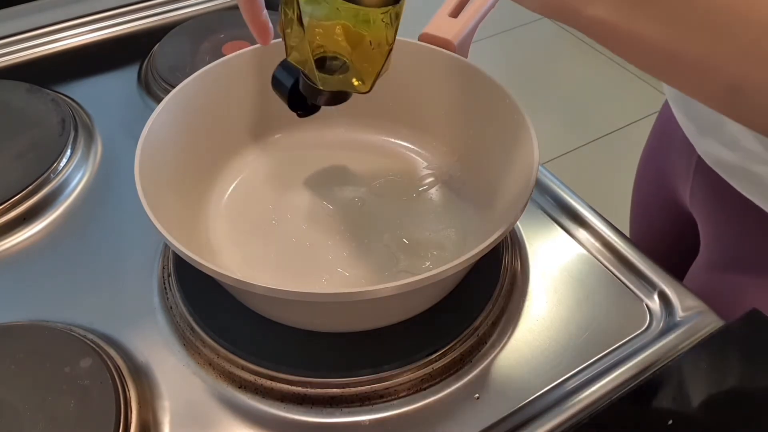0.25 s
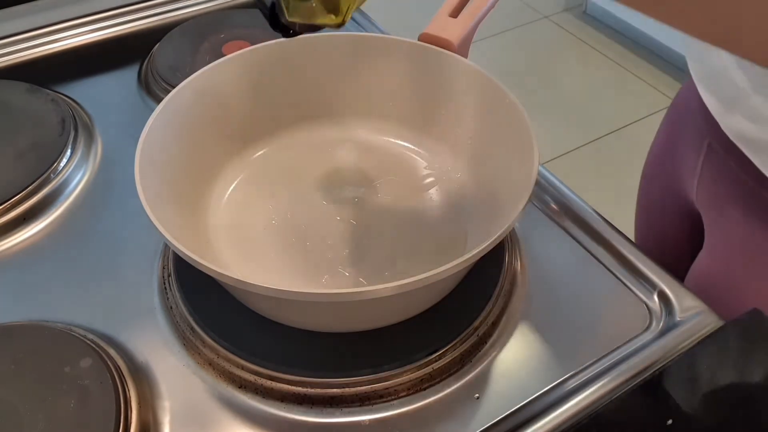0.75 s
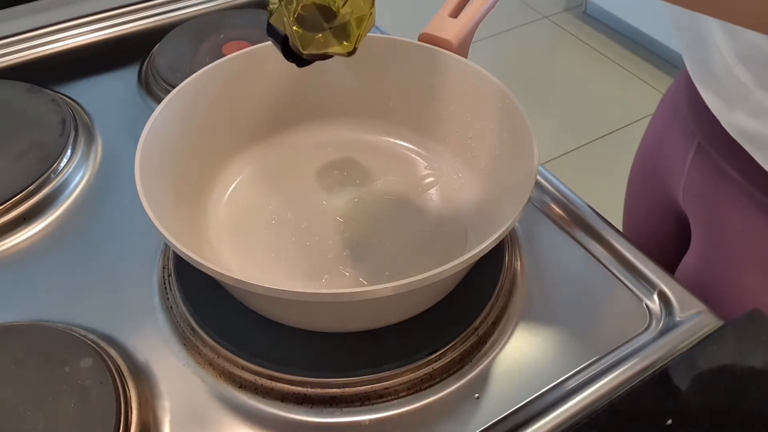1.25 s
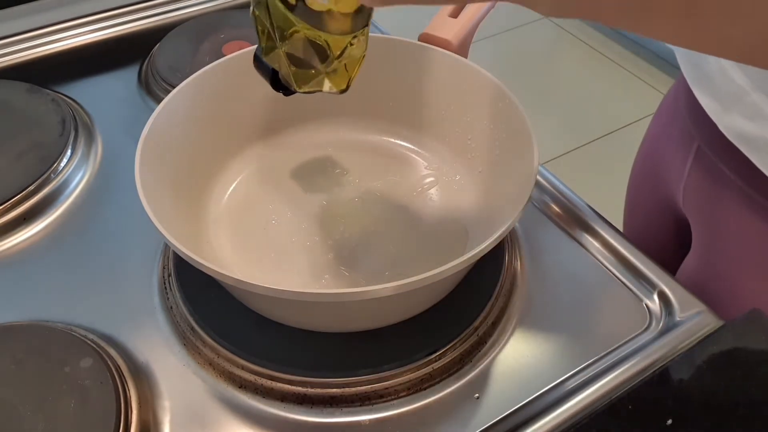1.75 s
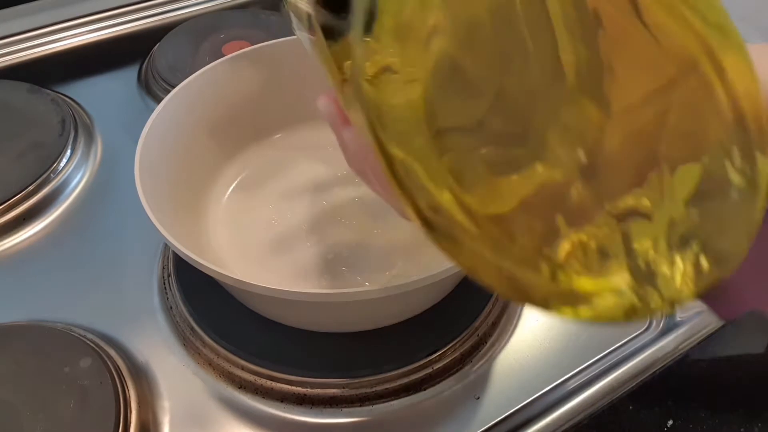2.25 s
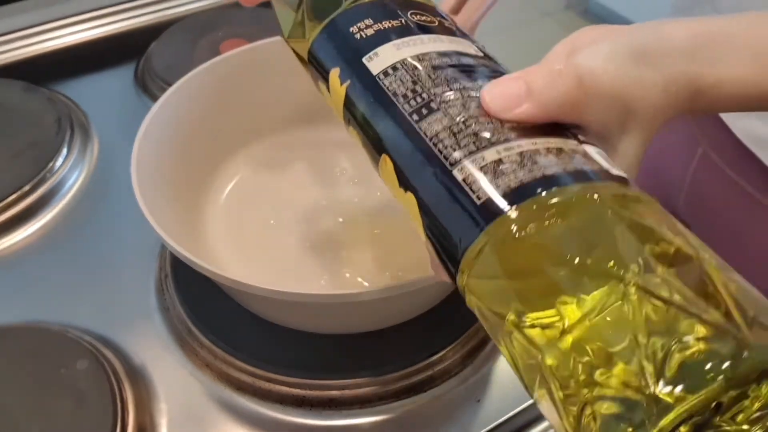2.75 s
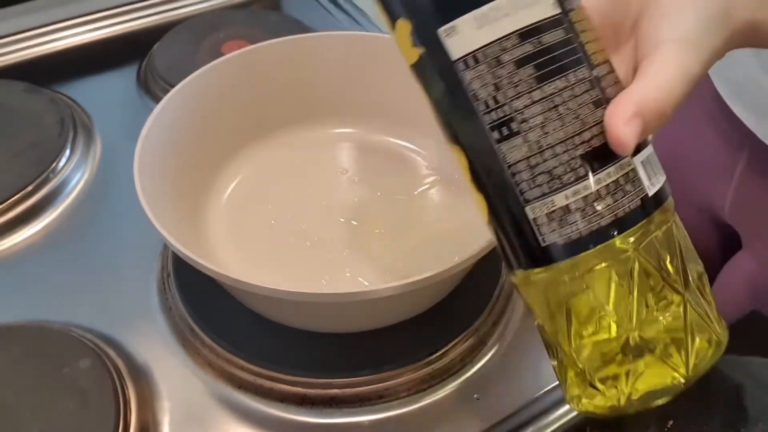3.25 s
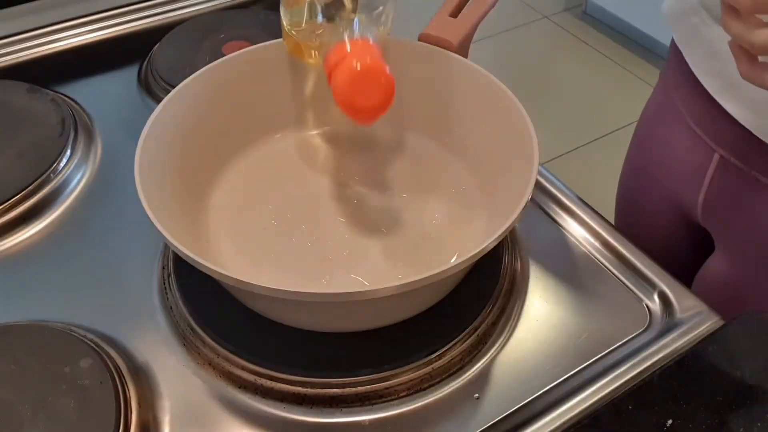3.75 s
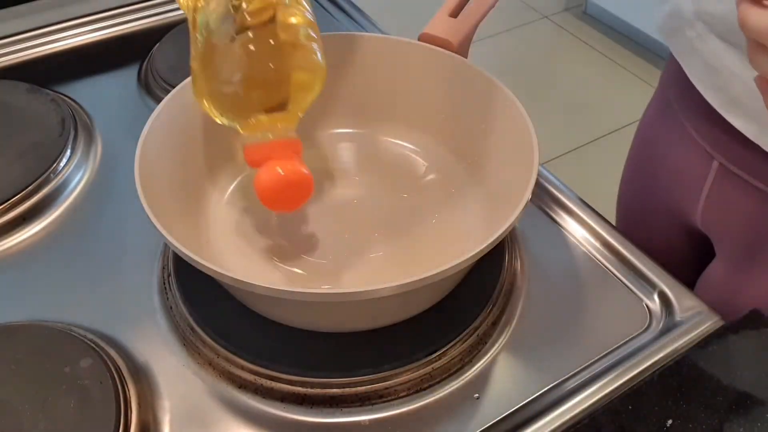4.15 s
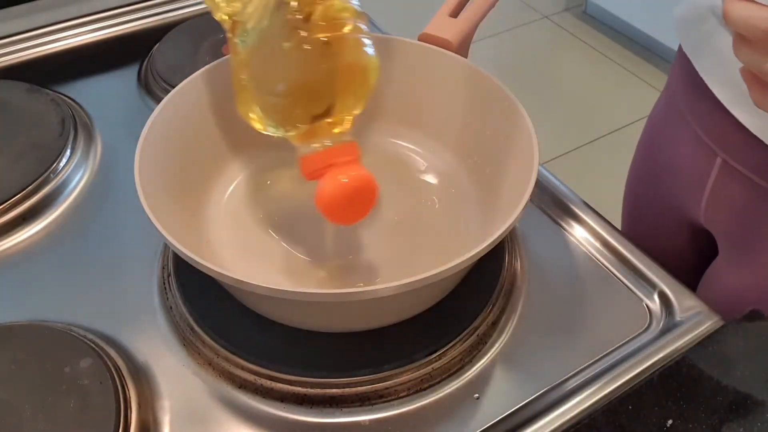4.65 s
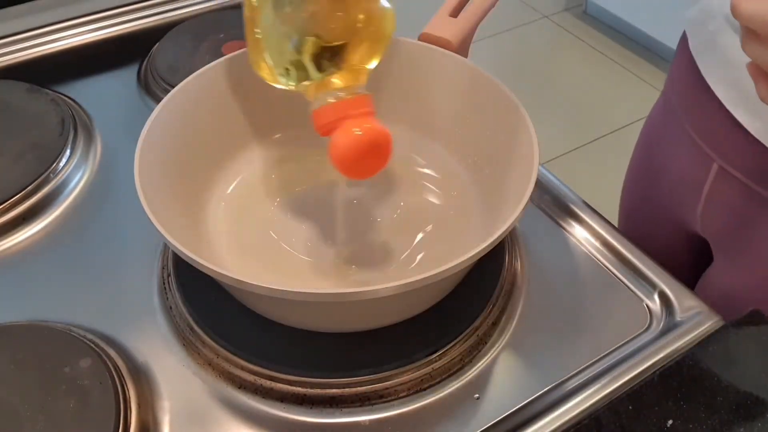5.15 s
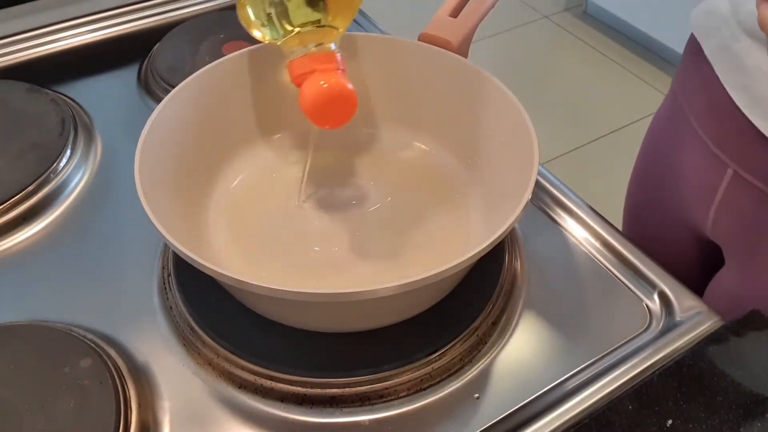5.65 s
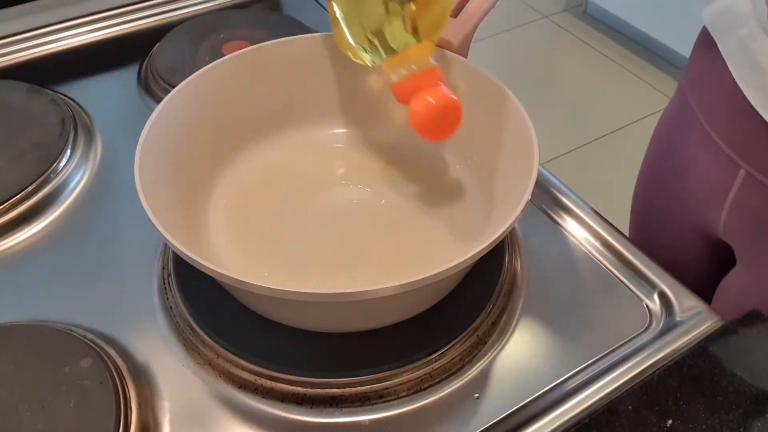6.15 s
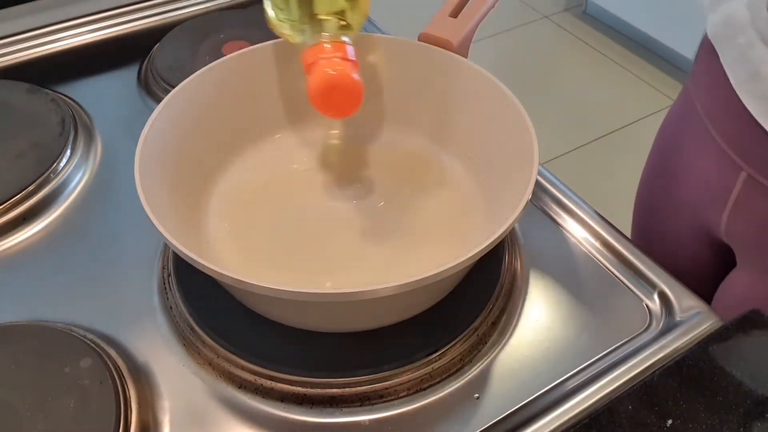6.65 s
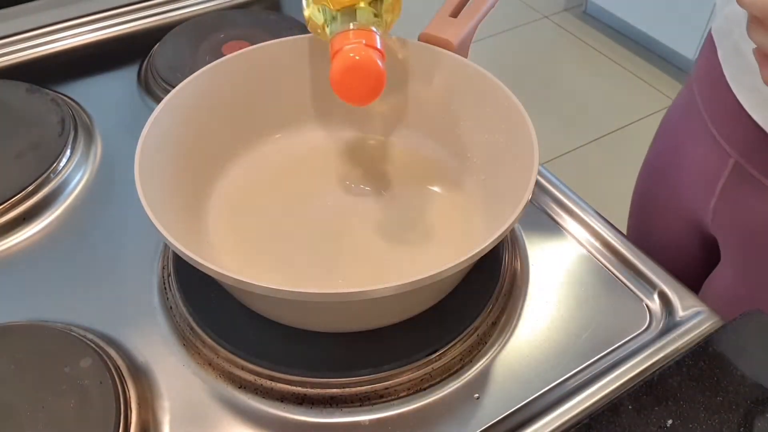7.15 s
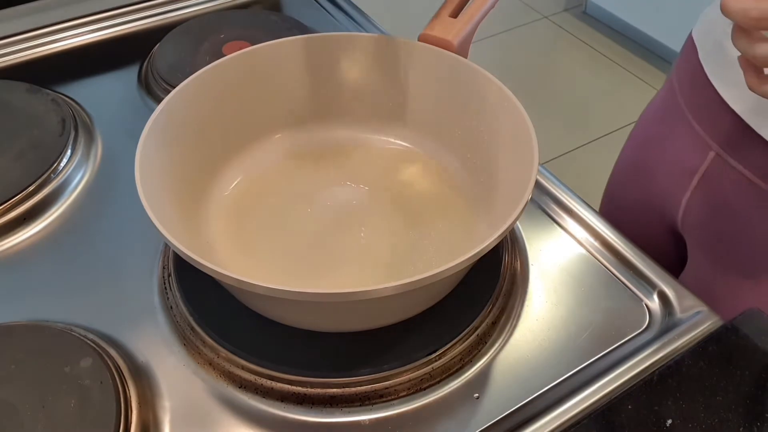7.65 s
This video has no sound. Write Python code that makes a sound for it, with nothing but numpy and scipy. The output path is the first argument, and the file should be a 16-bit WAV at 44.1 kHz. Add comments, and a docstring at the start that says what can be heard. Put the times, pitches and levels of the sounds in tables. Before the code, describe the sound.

Plastic oil bottles pop, hiss and softly glug as they are squeezed over a frying pan, above a low kitchen hum.

```python
"""A low hum and faint hiss fill a tiled kitchen; then a plastic bottle pops, squeezing oil into a frying pan.
Its thin walls buckle under the grip, and between squeezes air hisses and whistles back in at the spout,
where the oil spits and ticks. A second bottle glugs softly as it pours, each air bubble ringing as a
small resonator, and at last it crumples. The room reverberates behind it all."""
import sys
import numpy as np
from scipy import signal
from scipy.fft import rfft, irfft
from scipy.io import wavfile
from scipy.ndimage import uniform_filter1d

SR = 44100
rng = np.random.default_rng(int(sys.argv[2]) if len(sys.argv) > 2 else 0)


def bounce(signal):
    """Save signal as a 16-bit WAV file at the path given by the first command-line argument."""
    frames = np.transpose(np.atleast_2d(signal))
    limited = np.clip(frames, -1, 1)
    pcm = np.round(limited * 32767).astype(np.int16)
    wavfile.write(sys.argv[1], SR, pcm)


N = 348390
T = np.arange(N) / SR


def undb(db):
    """Decibels to amplitude ratio."""
    return 10 ** (np.asarray(db) / 20)


def unit(x):
    """Normalise to rms 1."""
    return x / np.sqrt(np.mean(x ** 2))


def curves(table):
    """Linear interpolation of (time_s, ...) rows: one curve for each further column."""
    times, *columns = np.transpose(table)
    return [np.interp(T, times, column) for column in columns]


def along(hz, points):
    """Interpolation of (frequency_hz, value) points on a logarithmic frequency axis."""
    f, value = np.transpose(points)
    return np.interp(np.log(np.maximum(hz, 1)), np.log(f), value)


def colour(x, points, size=4096):
    """Minimum-phase filter through (frequency_hz, gain_db) points, made by folding the cepstrum."""
    cepstrum = irfft(np.log(undb(along(np.fft.rfftfreq(size, 1 / SR), points))))
    cepstrum[1:size // 2] *= 2
    cepstrum[size // 2 + 1:] = 0
    response = irfft(np.exp(rfft(cepstrum)))
    return signal.fftconvolve(x, response[None], axes=-1)[:, :x.shape[-1]]


def resonate(x, hz, width_hz):
    """Second-order resonator with unit gain at its centre."""
    hz = min(hz, .42 * SR)
    return signal.lfilter(*signal.iirpeak(hz, hz / min(width_hz, SR / 4), fs=SR), x)


def drift(rate_hz):
    """Smooth random fluctuation of rms 1."""
    hold = int(SR / rate_hz)
    steps = np.repeat(rng.standard_normal(N // hold + 1), hold)
    return unit(uniform_filter1d(uniform_filter1d(steps, hold), hold)[:N])


def stereo_noise(size, correlation):
    """Partially coherent white noise in two channels."""
    mid, side = rng.standard_normal((2, size))
    sides = np.array([side, -side])
    return (np.sqrt(1 + correlation) * mid + np.sqrt(1 - correlation) * sides) / np.sqrt(2)


def gliding_noise(hz, width_hz):
    """Quadrature modulation: narrow-band noise of rms 1 about a moving centre."""
    lowpass = signal.butter(2, width_hz / 2, fs=SR, output="sos")
    slow = signal.sosfilt(lowpass, rng.standard_normal((2, N)))
    phase = 2 * np.pi * np.cumsum(hz) / SR
    return unit(slow[0] * np.cos(phase) + slow[1] * np.sin(phase))


def add(out, start_s, sound):
    """Superpose a short sound on the mix."""
    i = int(start_s * SR)
    out[:, i:i + sound.shape[-1]] += sound[..., :N - i]


# Spectral envelope shared by rumble and hiss: frequency_hz, gain_db
BACKGROUND_SPECTRUM = [(15, -51), (31, -13), (45, -2), (111, 1.5), (200, -7), (317, -25.5), (503, -18),
                       (695, -22), (2480, -35), (4400, -41.5), (5200, -50.5), (9000, -53), (11000, -63),
                       (16000, -74)]
# Partials of the appliance hum: pitch_hz, level_db
HUM_PARTIALS = [(104.5, -52.5), (128, -54), (190, -56), (230, -60)]
# Slow swell of rumble and hum: time_s, gain_db
RUMBLE_SWELL = [(0, -2.5), (.6, 1), (2.8, -3.5), (3.6, -8), (4.2, 1), (5.1, -2), (6.3, -4), (6.55, 1.5),
                (6.85, -4), (7.5, -1)]
def background():
    """Coherence: a wavering hum and rumble, equal in both channels, lie under a wide, incoherent hiss."""
    swell = undb(curves(RUMBLE_SWELL)[0])
    rumble = colour(stereo_noise(N, 1), [(220, -1), (330, -7), (900, -41)]) * swell
    hiss_db = 1.44 - 7.5 * np.exp(-((T - 3.475) / .22) ** 2)  # the hiss dips briefly
    hiss = colour(stereo_noise(N, .092), [(120, -26), (220, -12), (330, 0)])
    hiss *= undb(hiss_db + .5 * drift(12))
    hum = 0
    for hz, level_db in HUM_PARTIALS:
        amplitude = np.sqrt(2) * undb(level_db + 3.7 * drift(7.9))
        hum += amplitude * np.sin(2 * np.pi * np.cumsum(hz + 3 * drift(12)) / SR)
    return undb(-43.5) * unit(colour(rumble + hiss, BACKGROUND_SPECTRUM)) + hum * swell


def snap(t60_s, click_db, correlation, size=4096):
    """Impulse response of wall waves and hob reflections. Rows: left, right, bare impulse for the room."""
    t, f = np.arange(size) / SR, np.fft.rfftfreq(size, 1 / SR)
    click = signal.unit_impulse(size)
    rattle = stereo_noise(size, correlation) * undb(-60 * t / t60_s) * (1 - np.exp(-t / .00038))
    # low waves linger in the wall after the treble has gone
    linger = colour(stereo_noise(size, correlation), [(900, -2.5), (4000, -12.5), (9000, -19)])
    linger *= undb(-60 * t / (3.1 * t60_s)) * (1 - np.exp(-t / .0013))
    response = unit(rattle + undb(-3.5) * linger) / np.sqrt(size) + undb(click_db) * click
    power = uniform_filter1d(np.mean(np.abs(rfft(response)) ** 2, axis=0), size=56)
    whitening = np.c_[f, -10 * np.log10(power)][1:]
    return np.vstack([colour(response, whitening), click])


# Spectral envelope common to all pops: frequency_hz, gain_db
WALL_SPECTRUM = [(35, -10.5), (90, 7), (330, 5.5), (650, 10), (1000, 6.5), (1500, 5.5), (4300, -0.5),
                 (6000, 1), (7700, -4.5), (9800, 7), (16000, -0.5)]
# Buckling panels: start_s, level_db, ring_hz, snap_ms, thump_db, room_send_db, left_over_right_db
BUCKLES = [(.245, -11.5, 2600, 0.42, -8, 1, 0), (.746, -2, 770, 0.41, -1.5, -0.5, -3.5),
           (1.568, -3.5, 779, 0.98, -14.5, -1.5, -6), (1.745, -20, 800, 0.3, -12, 2, 2),
           (1.766, -10, 3400, 0.16, -12, 5, 2.5), (1.935, -3, 860, 0.26, -10.5, -4, -4),
           (2.205, -8, 575, 0.18, 14, 6, -2.5), (2.226, -11.5, 380, 0.33, 2.5, -6, -2),
           (2.252, -9, 2220, 0.18, -7, -3, -2), (2.333, -10, 730, 0.15, 1.5, 5.5, 4.5),
           (2.411, -3, 616, 0.3, 2.5, -2.5, 2), (2.48, -6.5, 510, 0.14, -4, 4, -1.5),
           (2.54, -11.5, 2020, 0.14, -23.5, 6.5, 0.5), (3.014, -16, 1053, 0.37, 0.5, -3.5, 0),
           (4.183, -26, 2530, 0.43, -24, 1.5, -1), (5.217, -4.5, 1520, 0.57, -21.5, -2, -1),
           (7.6, -16, 1850, 0.44, -21, 5, 0), (7.639, -17.5, 450, 0.55, 2.5, 6, -0.5),
           (7.666, -18.5, 616, 1.24, -10, 3, -5), (7.673, -15.5, 1600, 0.23, -5, -11, -3),
           (7.698, -13, 1310, 0.24, -6, -0.5, -0.5), (7.865, -18.5, 2730, 0.25, -9, 2, -3)]
def wall_pops():
    """Snap-through buckling rings two panel modes and thumps the air inside; faster snaps are brighter."""
    out, hz = np.zeros((3, N)), np.geomspace(35, 16000, 28)
    for start_s, level_db, ring_hz, snap_ms, thump_db, room_db, pan_db in BUCKLES:
        roll_off_db = 10 * np.log10(1 + (hz * snap_ms / 1000) ** 6.4)
        thump_hz = 490 * (ring_hz / 700) ** .81  # the corner lies higher for a smaller panel
        bass_shelf_db = thump_db / (1 + (hz / thump_hz) ** 4)
        spectrum = np.c_[hz, along(hz, WALL_SPECTRUM) + bass_shelf_db - roll_off_db]
        crack_db = -7 + 2.5 * np.log2(.3 / snap_ms)
        t60_s = .022 * (1500 / ring_hz) ** .084  # large, low panels flap for longer
        click = snap(t60_s, crack_db, correlation=.4)
        panel = resonate(click, .87 * ring_hz, .2 * ring_hz)
        panel += resonate(click, 1.03 * ring_hz, .15 * ring_hz)
        thump = undb(4) * resonate(click, 115, 55) + undb(-5.5) * resonate(click, 230, 45)
        pop = unit(colour(click + undb(-6) * panel + thump, spectrum))
        # a panel that faces away sends more into the room
        directivity = undb([[pan_db / 2], [-pan_db / 2], [room_db]])
        add(out, start_s + .0009, undb(level_db - 16) * directivity * pop)
    return out


# Air drawn in as the grip eases: start_s, attack_s, hold_s, release_s, flow_db, extra_treble_db
AIR_INTAKES = [(0.29, 0.11, 0.043, 0.18, -26.5, 5), (0.683, 0.014, 0.12, 0.026, -35.5, 3),
               (1.261, 0.22, 0.57, 0.18, -30, -3.5), (2.156, 0.014, 0.013, 0.19, -27.5, -8.5),
               (2.25, 0.044, 0.33, 0.19, -37, -0.5), (7.625, 0.02, 0.046, 0.013, -30.5, 5)]
def airflow():
    """Pressure equalisation: envelopes of the inflow and of its treble, which rise, hold and die away."""
    flow, treble_flow = np.zeros((2, N))
    for start_s, attack_s, hold_s, release_s, flow_db, treble_db in AIR_INTAKES:
        age = np.maximum(T - start_s, 0)
        rise = np.clip(age / attack_s, 0, 1)
        fall = np.clip(1 - (age - attack_s - hold_s) / release_s, 0, 1) ** 2
        intake = rise * fall * undb(flow_db)
        flow += intake
        treble_flow += intake * undb(treble_db)
    return np.array([flow, treble_flow]) * undb(drift(12))


# Spectral envelope of the air jet: frequency_hz, gain_db
JET_SPECTRUM = [(60, -39), (200, -11.5), (480, -10.5), (790, -9), (960, -17), (1100, -10.5), (2300, -8),
                (3500, -14.5), (6200, -20), (15500, -22.5)]
# Resonances of the spout: centre_hz, width_hz, gain_db
SPOUT_RESONANCES = [(1280, 30, -1), (2083, 26, 7.5), (2650, 74, -2.5), (3120, 54, -1.5)]
# Neck resonance, shifting as the oil runs back: time_s, centre_hz, level_over_jet_db
NECK_RESONANCE = [(.33, 850, -11), (.4, 790, -4.5), (.54, 690, 4), (1.33, 770, 2), (1.55, 700, -5.5),
                  (1.85, 780, -6.5), (2.17, 770.4, -2.5), (2.3, 610, -5)]
def suction_hiss():
    """Turbulence excites the resonances of spout and neck; the oil film sputters in clustered bursts."""
    flow, treble_flow = airflow()
    onsets = rng.random(N) < 300 / SR * undb(5 * drift(20))
    bursts = onsets * undb(6 * np.minimum(rng.exponential(size=N), 3.5))
    sputter = undb(.5) * unit(bursts * rng.choice([-1, 1], N))
    jet = rng.standard_normal(N) * undb(2.4 * drift(170) + drift(25)) + sputter
    jet += sum(undb(db) * resonate(jet, hz, width) for hz, width, db in SPOUT_RESONANCES)
    jet = unit(colour(jet[None], JET_SPECTRUM))
    treble = colour(jet, [(2000, -21.5), (6000, -8.5), (12000, -8.5)])
    neck_hz, neck_db = curves(NECK_RESONANCE)
    neck = undb(neck_db) * gliding_noise(neck_hz, width_hz=230)
    opening = undb(2 * drift(10))  # the film narrows and widens the opening
    air = undb(-3.5) * (flow * (jet - treble + neck) + treble_flow * treble * opening)
    # reflections off pan and hob comb the hiss, and shift as the bottle moves
    paths = [snap(t60_s=.012, click_db=-3.5, correlation=.51) for _ in range(2)]
    here, there = (signal.fftconvolve(air, path, axes=-1)[:, :N] for path in paths)
    share = (1 + np.tanh(2 * drift(5))) / 2
    return share * here + (1 - share) * there


# Whistle of the oily spout as air starts to flow: time_s, pitch_hz, level_db, roughness_ratio
WHISTLE_CONTOUR = [(.302, 1610, -47, .3), (.306, 1707, -23.5, 0.1), (.312, 2024, -23, 0.5),
                   (.352, 1654, -29.5, 0.44), (.378, 1510, -42, 0.6)]
def spout_whistle():
    """An edge tone and its octave leap up, then fall and blur into turbulence as the pressure evens out."""
    hz, level_db, roughness = curves(WHISTLE_CONTOUR)
    purity = np.sqrt(1 - roughness ** 2)
    phase = 2 * np.pi * np.cumsum(hz * (1 + .007 * drift(900))) / SR
    tone = 0
    for harmonic, weight in (1, 1), (2, purity):
        breath = gliding_noise(harmonic * hz, width_hz=harmonic * 280) / np.sqrt(2)
        tone += weight * (purity * np.sin(harmonic * phase) + roughness * breath)
    sounding = (T > WHISTLE_CONTOUR[0][0]) & (T < WHISTLE_CONTOUR[-1][0])
    return sounding * undb(level_db + drift(400)) * tone


# Oil spits and small creaks of the plastic: start_s, level_db, centre_hz, knock_over_tick_db, ring_ms
SPITS_AND_CREAKS = [(0.513, -27.5, 9550, -11, 44), (1.443, -26, 4100, -18, 19), (1.603, -20, 11000, -5, 22),
                    (2.014, -21, 10500, -8, 23), (2.839, -45, 3700, 17.5, 25),
                    (2.937, -40.5, 6850, 9.5, 11), (3.012, -34, 12800, -7, 18), (4.219, -38, 4000, 5, 31),
                    (4.491, -45, 10500, 11, 15), (4.686, -40, 10000, -8, 14), (5.409, -33.5, 3950, 5, 55),
                    (5.781, -44.5, 9100, -14, 15), (5.83, -38.5, 7450, -3.5, 9.7),
                    (5.987, -41, 6700, -15, 42), (6.122, -47.5, 5800, 3, 20), (6.207, -45.5, 5500, 10, 11),
                    (6.371, -40, 6130, 5, 100), (6.634, -39.5, 3850, 12, 26), (6.78, -36, 6420, -21.5, 36),
                    (7.24, -37.5, 2800, 3, 94), (7.329, -42, 4930, 2, 60), (7.341, -46.5, 10970, -1, 70)]
def spout_ticks():
    """Time-bandwidth reciprocity: short ticks are broad, long ones pitched; each also knocks the bottle."""
    out = np.zeros((3, N))
    broad_ms = 5.4  # a tick this brief is as wide as its centre frequency
    for start_s, level_db, hz, knock_db, ring_ms in SPITS_AND_CREAKS:
        click = snap(t60_s=ring_ms / 1000, click_db=-13.5, correlation=.48)
        ring = resonate(click, hz, hz * broad_ms / ring_ms)
        tick = colour(ring, [(1000, -15), (3500, 6), (10500, 0), (16000, -24.5)])
        knock = colour(click, [(200, -21), (900, .5), (1700, 3), (5000, -19), (16000, -59)])
        add(out, start_s + .00044, undb(level_db - 21.5) * (unit(tick) + undb(knock_db) * unit(knock)))
    return out


def bubble(hz, level_db):
    """A damped oscillator: a bubble swells, pinches off and rings with rising pitch in viscous oil."""
    t = np.arange(SR // 4) / SR
    swell_s, rise_octaves = .004, .28
    t60_s = .085 * (500 / hz) ** .16  # bigger bubbles ring longer
    phase = 2 * np.pi * np.cumsum(hz * 2 ** (rise_octaves * np.minimum(t / t60_s, 1))) / SR
    squelch = unit(resonate(resonate(stereo_noise(len(t), .5), hz, .42 * hz), hz, .42 * hz))
    envelope = undb(level_db - 60 * np.maximum(t - swell_s, 0) / t60_s) * np.minimum(t / swell_s, 1)
    return envelope * (undb(-3.5) * np.sin(phase) + undb(-8) * squelch)


# Air bubbles in the oil, from deep gulps at the neck to tiny pips: start_s, pitch_hz, level_db
AIR_BUBBLES = [(2.217, 195, -19.5), (2.913, 752, -31.5), (4.09, 666, -37), (4.131, 980, -22.5),
               (4.137, 248, -22), (4.143, 1336, -33), (4.16, 420, -17), (4.19, 2040, -36),
               (4.226, 1170, -34), (4.246, 2100, -39.5), (4.3, 2480, -43), (4.394, 2330, -46.5),
               (4.41, 1680, -40.5), (4.444, 1360, -39.5), (4.444, 390, -23), (4.556, 1720, -40),
               (4.603, 3920, -53), (5.513, 2570, -47), (5.527, 230, -29.5), (5.53, 610, -40),
               (5.568, 3820, -50.5), (6.163, 5340, -53), (6.373, 382, -33), (6.39, 1620, -38.5),
               (7.36, 1440, -36.5), (7.456, 1720, -37), (7.665, 131, -23)]
def oil_glugs():
    """Bubble resonance: each gulp is one main bubble and a faint splutter of three more."""
    out = np.zeros((2, N))
    splutter_s, splutter_hz = .02, 1380  # longest delay; the pitch they scatter towards
    for start_s, hz, level_db in AIR_BUBBLES:
        add(out, start_s, bubble(hz, level_db))
        for delay, pull in rng.random(size=(3, 2)):
            add(out, start_s + delay * splutter_s, bubble(hz * (splutter_hz / hz) ** pull, level_db - 15.5))
    return out


# The second bottle crumpling as it is tipped back: time_s, level_db
CRUMPLE_ENVELOPE = [(7.601, -25.5), (7.645, -33.5), (7.712, -28), (7.73, -62)]
# Modes of its wall: centre_hz, width_hz, gain_db
WALL_MODES = [(670, 94, 1), (1170, 170, -7.5), (1600, 280, -5.5), (2083, 70, -3), (2900, 300, -11)]
def bottle_crumple():
    """Modal excitation: a quick random run of creases, each ringing the wall's modes in its own mix."""
    creases_per_s, scatter_db = 450, 2.5
    sounding = (T > CRUMPLE_ENVELOPE[0][0]) & (T < CRUMPLE_ENVELOPE[-1][0])
    envelope = sounding * undb(curves(CRUMPLE_ENVELOPE)[0])
    creases = (rng.random(N) < creases_per_s / SR) * undb(scatter_db * rng.standard_normal(N)) * envelope
    wall = 0
    for hz, width_hz, gain_db in WALL_MODES:
        drive = creases * rng.standard_normal(N)
        wall += undb(gain_db) * resonate(resonate(drive, hz, width_hz), hz, width_hz)
    return np.sqrt(np.mean(envelope ** 2)) * unit(wall)


# Reverberation time of the tiled kitchen: frequency_hz, t60_s
REVERB_TIMES = [(100, 0.32), (500, 0.46), (1500, 0.65), (4500, 0.67), (9000, 0.51), (16000, 0.15)]
# Spectrum of the reverberation against the sound that feeds it: frequency_hz, gain_db
REVERB_SPECTRUM = [(100, -5), (300, -3.5), (2000, -8.5), (5500, -4), (8000, -7), (16000, -4.5)]
def kitchen_reverb(x):
    """A diffuse field decays exponentially in each band and is nearly incoherent between the channels."""
    t, f = np.arange(SR) / SR, np.fft.rfftfreq(SR, 1 / SR)
    noise_spectrum = rfft(stereo_noise(SR, .11))
    centres_hz, t60s = np.transpose(REVERB_TIMES)
    onset = np.clip((t - .004) / .0019, 0, 1)
    tail = 0
    for t60_s, weights in zip(t60s, np.eye(len(t60s))):
        band = irfft(noise_spectrum * along(f, np.c_[centres_hz, weights]), SR)
        decay = undb(-60 * t / t60_s) * onset
        tail += band * decay / np.sqrt(np.sum(decay ** 2))
    return signal.fftconvolve(x[None], colour(tail, REVERB_SPECTRUM), axes=-1)[:, :N]


# Channel balance of the direct sound at the pan: frequency_hz, left_over_right_db
PAN_BALANCE = [(150, -7.5), (280, -3.5), (500, 12.5), (1000, 3), (2000, 1.7), (4200, 4.5), (8000, 0),
               (13000, -4)]
def scene():
    """Superposition: close bottles a little to the left, their reverberation and the background."""
    bottle = wall_pops() + spout_ticks() + suction_hiss() + spout_whistle() + bottle_crumple()
    oil = oil_glugs()
    near, balance = bottle[:2] + oil, np.array(PAN_BALANCE)
    direct = np.vstack([colour(near[:1], balance * [1, .5]), colour(near[1:], balance * [1, -.5])])
    room_send = bottle[2] + undb(-.5) * oil.mean(axis=0)
    left, right = direct + kitchen_reverb(room_send)
    # long waves reach both channels alike
    side = colour(np.array([left - right]) / 2, [(180, -23), (280, -3.5), (600, -1), (2500, 2)])
    return (left + right) / 2 + np.vstack([side, -side]) + background()


def record(dry):
    """Soft saturation rounds the loudest peaks; a steep low-pass cuts the top."""
    cutoff_hz = 16300
    rounded = dry / (1 + dry ** 6) ** (1 / 6)
    return signal.sosfilt(signal.ellip(8, .2, 70, cutoff_hz, fs=SR, output="sos"), rounded)


dry = scene()
out = record(dry)
bounce(out)
```